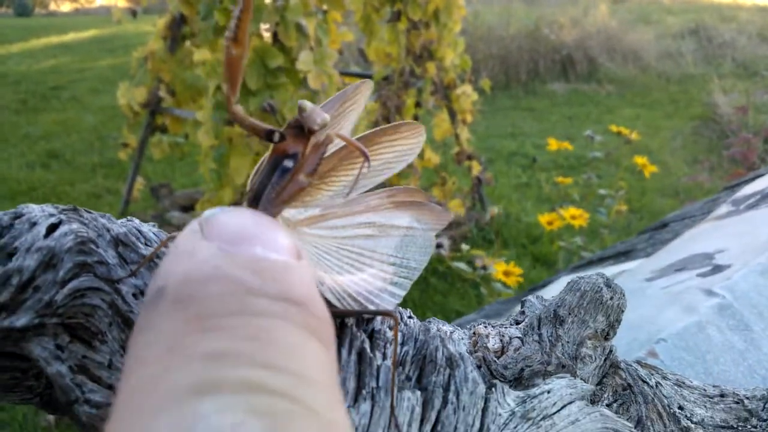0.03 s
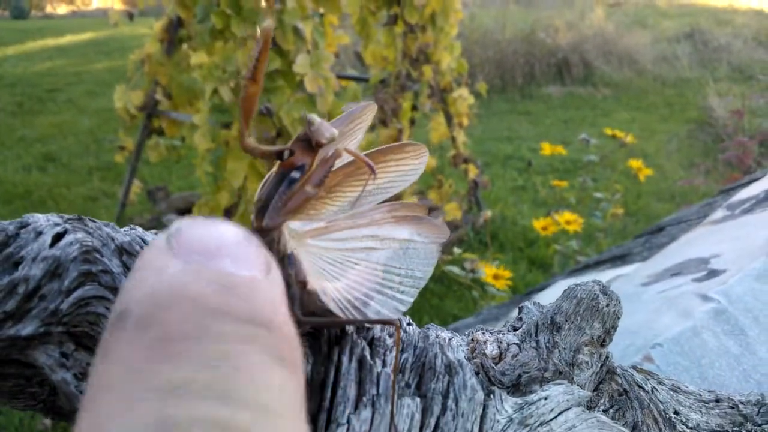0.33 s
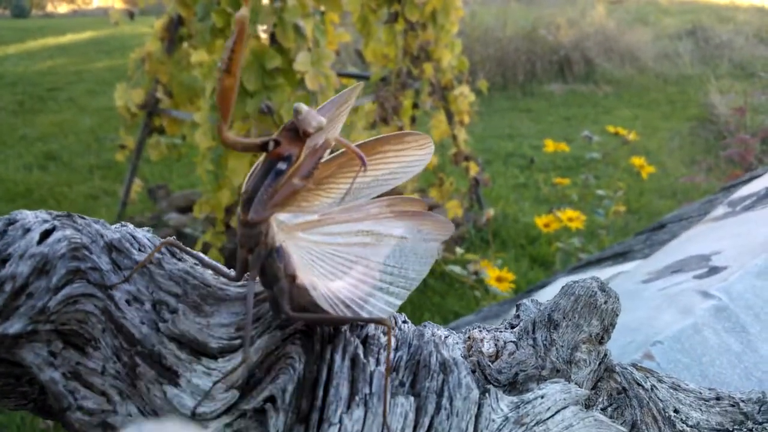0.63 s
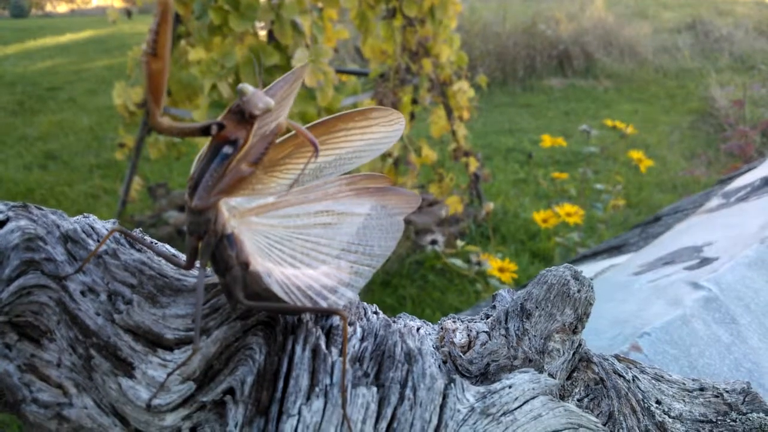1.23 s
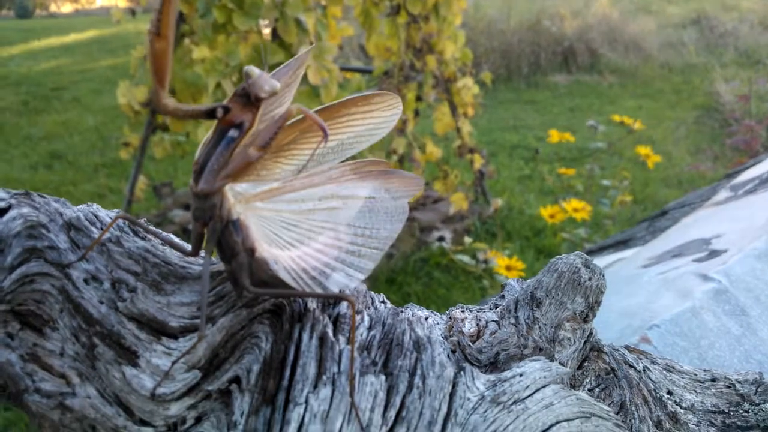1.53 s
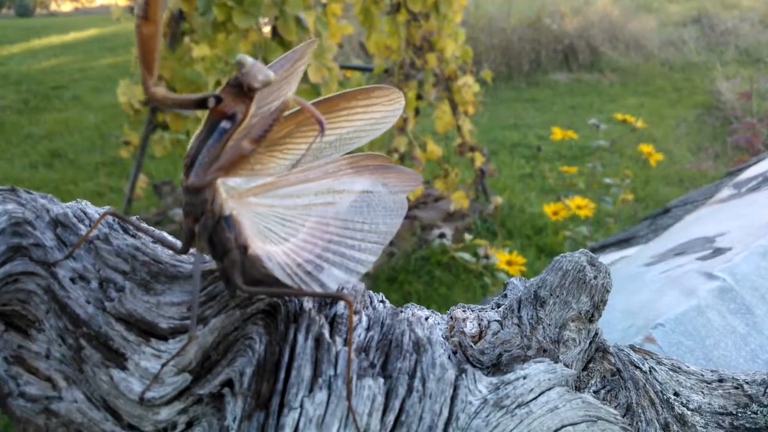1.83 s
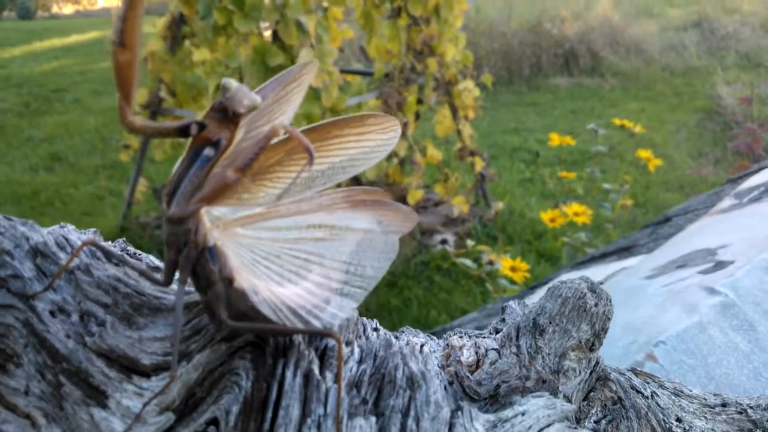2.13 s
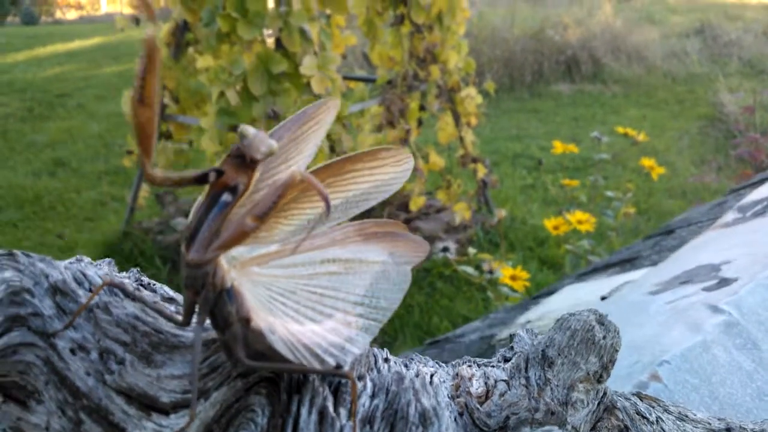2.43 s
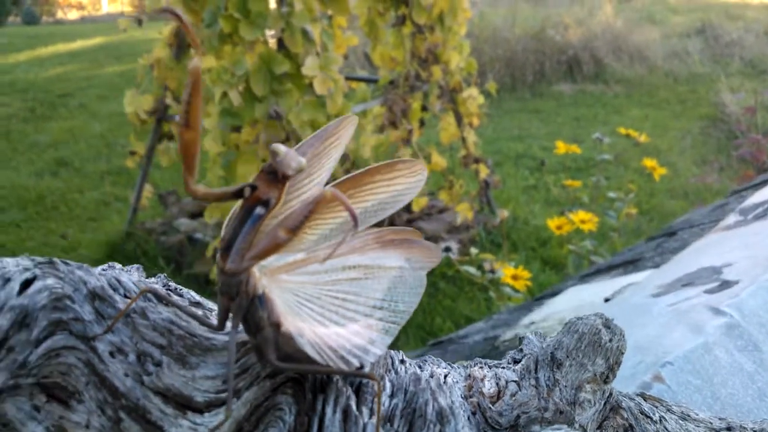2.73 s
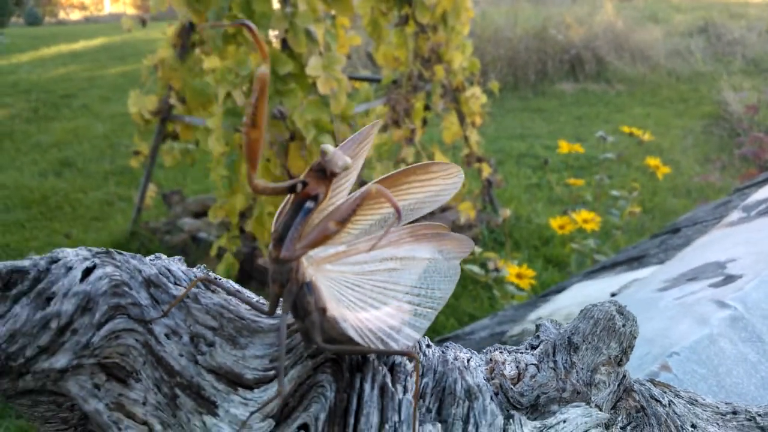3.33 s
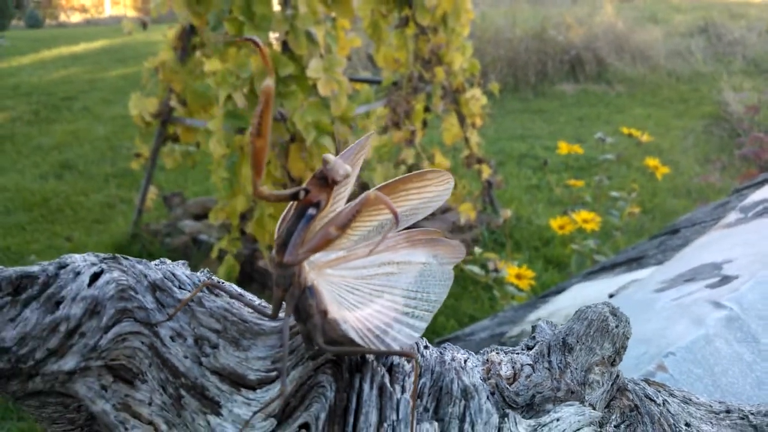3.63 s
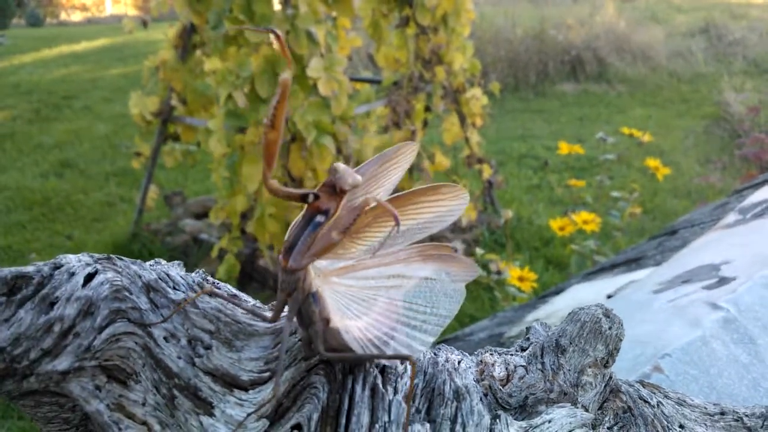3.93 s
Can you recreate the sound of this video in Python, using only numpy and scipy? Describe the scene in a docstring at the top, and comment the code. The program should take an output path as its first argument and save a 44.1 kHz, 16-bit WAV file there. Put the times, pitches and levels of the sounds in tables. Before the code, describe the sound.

A mantis scrapes its spread wings twice, making two soft, breathy swishes about a second and a half apart. A light garden breeze rumbles unevenly on the close microphone, over faint hiss and a few dull scuffs.

```python
"""From the start, faint garden air lies under the recorder's own hiss and thin whine, while a light breeze
buffets the close microphone with turbulent pressure. A few dull scuffs come and go. Near 0.7 s a mantis
in threat display on a log scrapes its abdomen along its spread hind wings: countless tiny frictional
slips shake the membrane and merge into a soft swish. A second scrape follows near 2.1 s, and breeze,
air, hiss and whine carry on to the end."""
import sys
import numpy as np
from scipy import signal
from scipy.fft import rfft, irfft
from scipy.io import wavfile
from scipy.ndimage import uniform_filter1d

SR = 44100
rng = np.random.default_rng(int(sys.argv[2]) if len(sys.argv) > 2 else 0)


def store_wav(level_fs):
    """Save 16-bit WAV to argv[1]."""
    pcm = np.round(np.clip(np.atleast_2d(level_fs), -1, 1) * 32767)
    wavfile.write(sys.argv[1], SR, pcm.T.astype(np.int16))


N = 176400
T = np.arange(N) / SR
HZ = np.fft.rfftfreq(N, 1 / SR)


def amp(db):
    """The decibel scale: 20 dB is a factor of ten in amplitude."""
    return 10 ** (np.asarray(db) / 20)


def spectrum(points):
    """Interpolation of (frequency [Hz], level [dB]) points on a log-frequency axis."""
    hz, db = np.transpose(points)
    return np.interp(np.log(HZ + 1), np.log(hz + 1), db)


def resonance(hz, width_hz, db):
    """A resonance peak: a Lorentzian curve of gain in dB."""
    return db / (1 + (2 * (HZ - hz) / width_hz) ** 2)


def coloured(x, db):
    """Linear filtering: the spectrum of x is weighted by a curve in dB, then scaled to rms 1."""
    filtered = irfft(rfft(x) * amp(db), N)
    return filtered / np.sqrt(np.mean(filtered ** 2) + 1e-20)


def noise(db):
    """Filtered white noise takes on the filter's spectrum; rms 1."""
    return coloured(rng.standard_normal(N), db)


def drift(rate_hz):
    """Low-pass noise wanders slowly; rms 1."""
    return noise(-20 * np.log10(1 + (HZ / rate_hz) ** 4))


def steadied(x, seconds):
    """Division by the running rms holds the level of x near 1."""
    size = max(int(seconds * SR), 8)
    power = uniform_filter1d(uniform_filter1d(x ** 2, size), size)
    return x / np.sqrt(abs(power) + 1e-12)


def puff(at, length, hz, db, half_width_oct):
    """Amplitude modulation: a band of noise under a Gaussian envelope of standard deviation `length`."""
    band = noise(-10 * np.log10(2) * (np.log2((HZ + 1) / hz) / half_width_oct) ** 2)
    envelope = np.exp(-.5 * ((T - at) / length) ** 2)
    return amp(db) * envelope * steadied(band, 2 * length)


# Spectrum of garden air and hiss: (frequency [Hz], relative level [dB])
AIR_SPECTRUM = [(20, 6.5), (100, 4), (200, 3.5), (330, -0.5), (500, 0), (900, -4), (1500, -7), (2100, -8),
                (3200, -10), (6000, -11), (10000, -10.5), (16000, -11)]
# Resonances in the hiss: (frequency [Hz], width [Hz], gain [dB])
HISS_RESONANCES = [(4507, 950, 8.5), (1990, 190, 2)]
# Swell of the distant air: (time [s], gain [dB])
AIR_SWELL = [(0, 0.3), (0.5, 0.1), (1.2, -0.55), (2.3, 0), (3.3, -0.4), (3.7, 1), (4, 0.5)]


def air_and_hiss(level_db=-66.5, drift_db=0.33, swell_top_hz=2610):
    """Broadband background noise: garden air swells gently in the lower band, beneath microphone hiss."""
    bed = noise(spectrum(AIR_SPECTRUM) + sum(resonance(*row) for row in HISS_RESONANCES))
    lower_band = irfft(rfft(bed) / (1 + (HZ / swell_top_hz) ** 4), N)
    swell = amp(np.interp(T, *np.transpose(AIR_SWELL)))
    return amp(level_db + drift_db * drift(rate_hz=4.9)) * (bed + (swell - 1) * lower_band)


# Partials of the electrical whine: (harmonic number, level [dB])
WHINE_HARMONICS = [(2, -91), (4, -87), (5, -91), (6, -92.5)]


def whine(fundamental_hz=534.55, wander_hz=0.3):
    """A harmonic series from the recorder's electronics, on a missing, slightly wandering fundamental."""
    cycles = np.cumsum(fundamental_hz + wander_hz * drift(rate_hz=6)) / SR
    return sum(amp(db) * np.sqrt(2) * np.sin(2 * np.pi * (round(k) * cycles + rng.random()))
               for k, db in WHINE_HARMONICS)


# Course of the breeze on the microphone: (time [s], relative level [dB])
BREEZE_LEVELS = [(0.0, -45.5), (0.1, -45), (0.12, -47.5), (0.38, -53.5), (0.44, -60.5), (0.58, -50),
                 (0.6, -63), (0.71, -64), (0.75, -44.5), (0.88, -57), (0.98, -45.5), (1.02, -50.5),
                 (1.24, -43.5), (1.28, -52), (1.44, -53), (1.48, -48), (1.58, -58.5), (1.66, -48),
                 (1.73, -66), (1.77, -49.5), (1.88, -61.5), (2.21, -50), (2.24, -56), (2.45, -50.5),
                 (2.53, -54.5), (2.57, -50.5), (2.8, -62), (3.05, -67), (3.14, -51.5), (3.25, -57.5),
                 (3.35, -51.5), (3.44, -58), (3.45, -52.5), (3.6, -48), (3.7, -56.5), (4.0, -57.5)]
# Spectrum of its rumble: (frequency [Hz], relative level [dB])
RUMBLE_SPECTRUM = [(5, -30), (15, 6), (30, -1), (50, -2), (70, -8), (100, -16.5), (140, -25), (200, -39),
                   (400, -47.5), (1500, -99)]
# Single eddies: (time [s], length [s], centre frequency [Hz], level [dB], half-width [octaves])
EDDY_THUMPS = [(0.079, 0.0081, 78, -52, 0.43), (0.747, 0.01, 47, -42.5, 0.38),
               (1.033, 0.019, 118, -56, 0.35), (1.484, 0.015, 60, -52, 0.49),
               (2.189, 0.014, 107, -47.5, 0.21), (3.463, 0.0084, 60, -45, 0.36)]


def breeze(gain_db=1.83, flutter_db=0.52):
    """Turbulence: fluctuating pressure on the microphone rumbles, and single eddies thump."""
    level_db = np.interp(T, *np.transpose(BREEZE_LEVELS)) + gain_db
    envelope = amp(level_db + flutter_db * drift(rate_hz=22))
    rumble = steadied(noise(spectrum(RUMBLE_SPECTRUM)), seconds=0.077)
    return envelope * rumble + sum(puff(*row) for row in EDDY_THUMPS)


# Scuffs near the microphone: (time [s], length [s], centre frequency [Hz], level [dB])
SCUFF_BURSTS = [(0.09, 0.022, 900, -72.5), (0.345, 0.025, 696, -76), (0.412, 0.024, 970, -72.5),
                (1.747, 0.0067, 1480, -71), (2.183, 0.0095, 1000, -72), (2.194, 0.0099, 227, -65.5),
                (2.813, 0.01, 326, -78)]


def scuffs():
    """Band-limited transients: brief noise bursts with little treble are heard as dull brushing."""
    return sum(puff(*row, half_width_oct=0.4) for row in SCUFF_BURSTS)


# Response of the wing membrane: (frequency [Hz], relative level [dB])
WING_RESPONSE = [(150, -33), (450, -5), (900, 5), (1300, 1.5), (2000, 5), (3000, 4.5), (4500, 3),
                 (6500, -4.5), (9000, -7.5), (15000, -24)]
# Scrapes: (time of fastest rub [s], rise [s], fall [s], level [dB], tilt [dB/octave],
# resonance gain [dB], shape [1 pointed, 2 round])
WING_SCRAPES = [(0.684, 0.089, 0.14, -63, -0.37, 4.6, 1.3), (2.118, 0.094, 0.11, -63.7, 0.16, 1.1, 2.4)]
SLIPS_PER_S, SLIP_SPREAD_DB, TILT_PIVOT_HZ = 14000, 2, 2500


def wing_scrape(at, rise, fall, db, tilt_db, ring_db, shape):
    """Stick-slip friction: the abdomen rubs the wing veins and shakes the membrane, louder with speed."""
    time_from_peak = abs(T - at) / np.where(T < at, rise, fall)
    speed = np.exp(-np.sqrt(2) * time_from_peak ** shape)
    slipping = rng.random(N) < SLIPS_PER_S / SR
    slips = slipping * rng.choice([-1., 1.], N) * amp(SLIP_SPREAD_DB * rng.standard_normal(N))
    membrane = spectrum(WING_RESPONSE) + resonance(hz=1860, width_hz=200, db=ring_db)
    tilt = tilt_db * np.log2((HZ + 1) / TILT_PIVOT_HZ)
    return amp(db) * speed * coloured(slips, membrane + tilt)


def scene():
    """Superposition: all sources add in one microphone channel."""
    wings = sum(wing_scrape(*row) for row in WING_SCRAPES)
    return (air_and_hiss() + whine() + breeze() + scuffs() + wings)[None]


def record(dry, cutoff_hz=15850):
    """Band limiting: the recorder's low-pass filter removes the highest treble."""
    lowpass = signal.firwin(511, cutoff_hz, window=("kaiser", 9), fs=SR)
    return signal.oaconvolve(dry, lowpass[None], "same")


dry = scene()
out = record(dry)
store_wav(out)
```